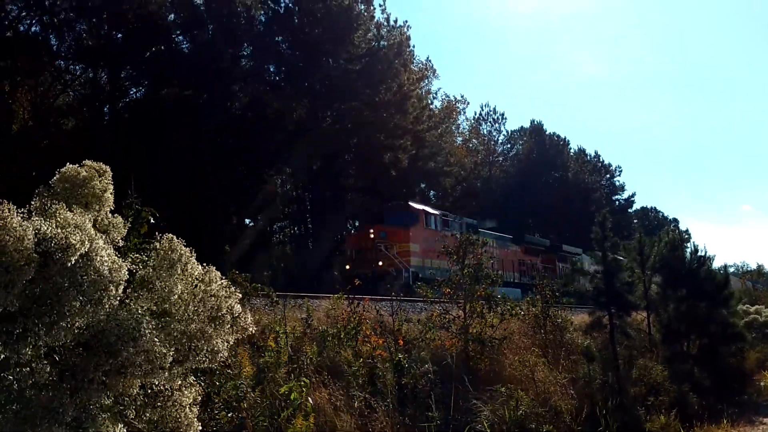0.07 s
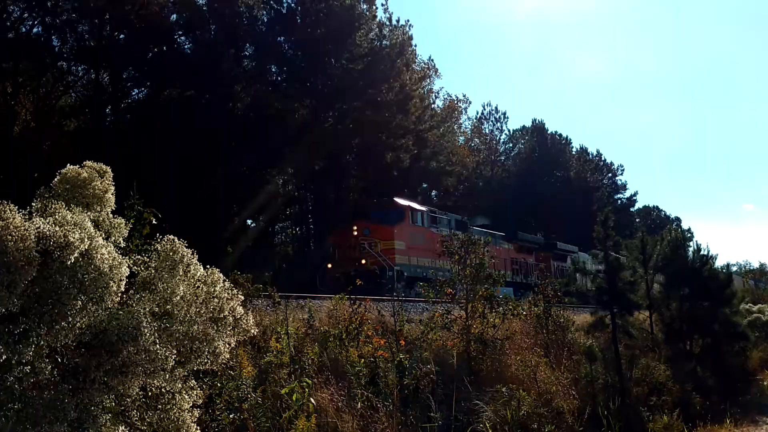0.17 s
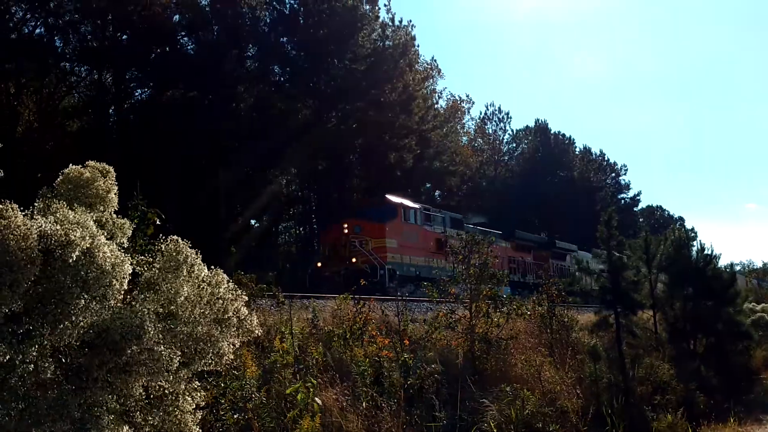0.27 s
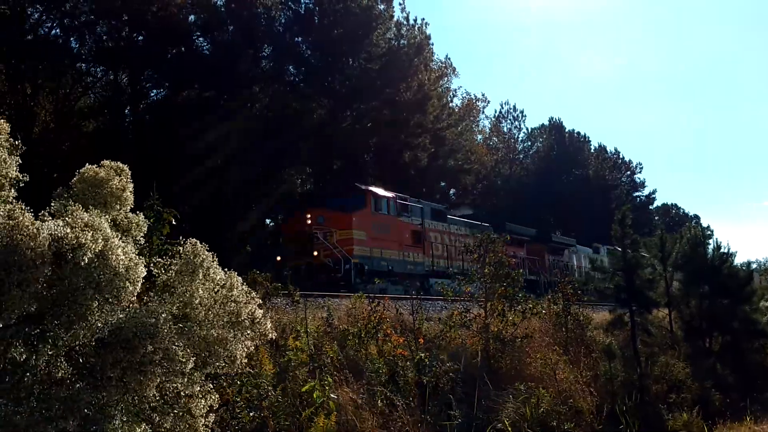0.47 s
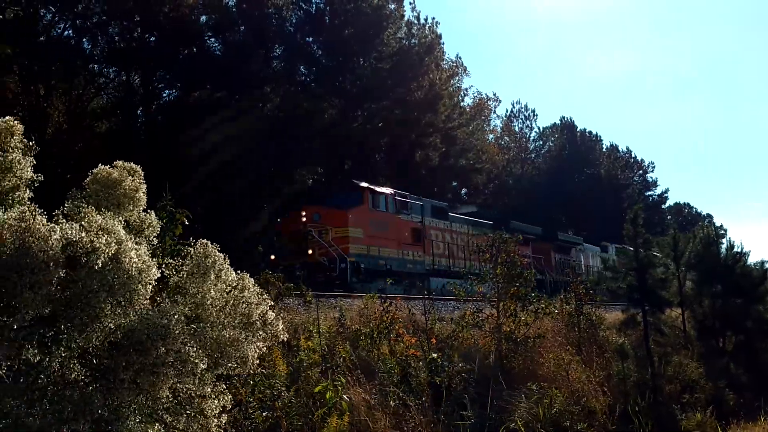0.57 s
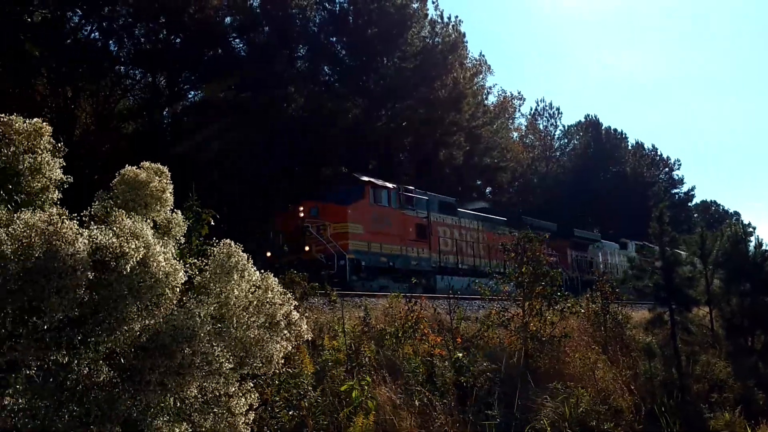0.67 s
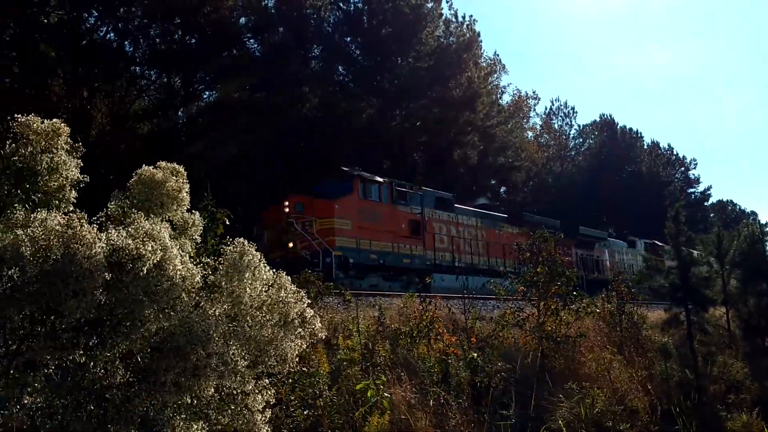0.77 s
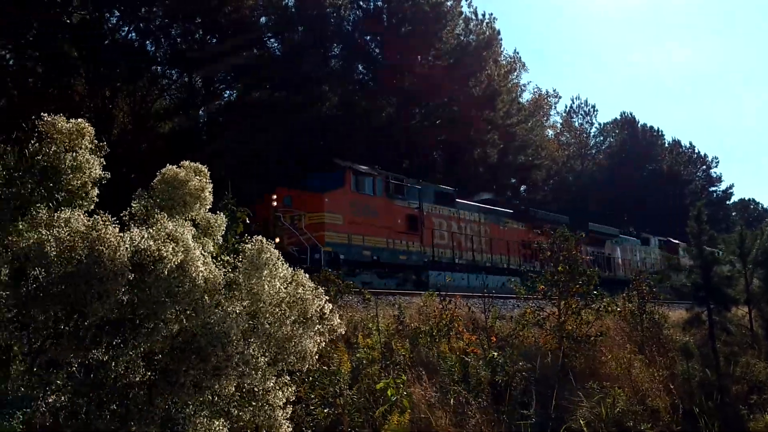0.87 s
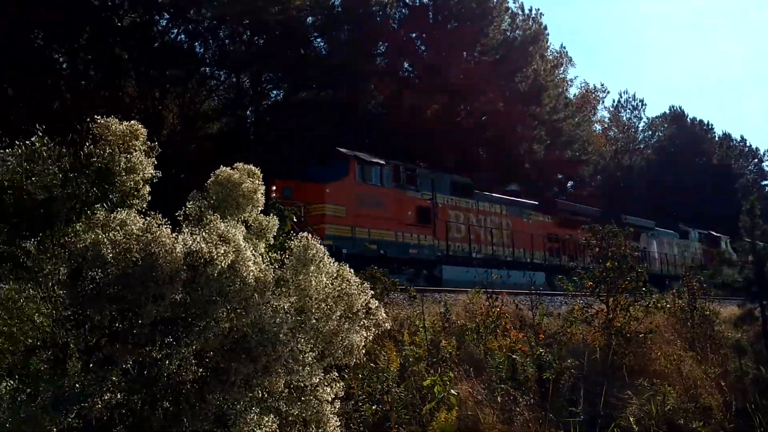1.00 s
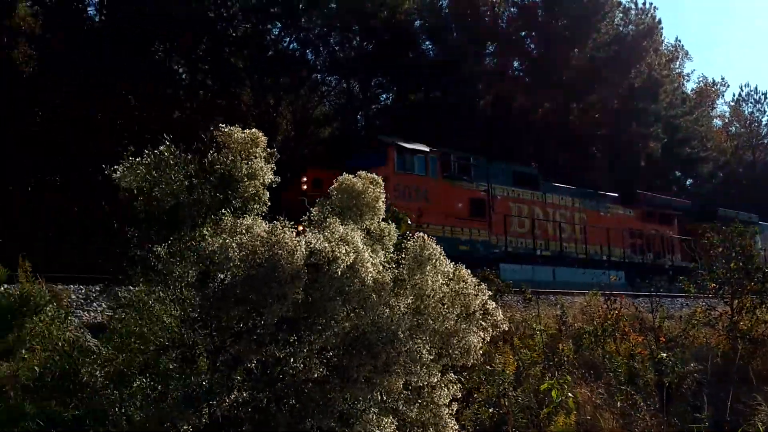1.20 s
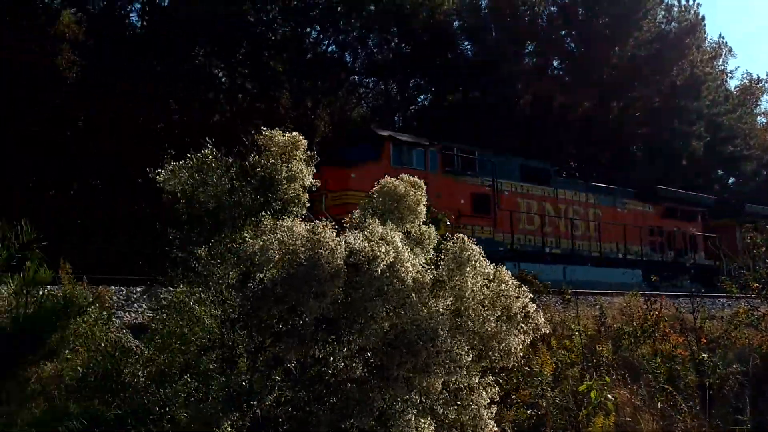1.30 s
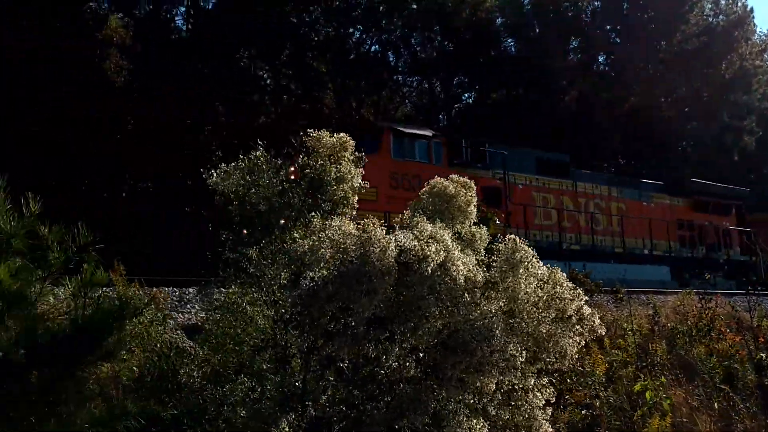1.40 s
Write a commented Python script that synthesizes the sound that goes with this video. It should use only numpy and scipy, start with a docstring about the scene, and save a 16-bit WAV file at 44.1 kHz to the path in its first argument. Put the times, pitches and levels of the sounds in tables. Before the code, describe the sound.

A train horn blows twice in quick succession over the low rumble of an approaching diesel freight train. The two-note blasts briefly overload the microphone and leave a short echo among the trackside trees.

```python
"""A two-note air horn gives two blasts as a freight locomotive comes out of the woods.
Each note is a stack of locked harmonics over rushing air, turning brassy as its pressure peaks.
Trees beside the track echo the horn; those behind the moving train send it back slightly flat.
Diesel and wheels rumble underneath, ducked by a limiter once the horn sounds, and the blasts
rasp briefly where they overload the microphone."""
import sys
import numpy as np
from scipy import signal
from scipy.fft import rfft, irfft
from scipy.io import wavfile
from scipy.ndimage import uniform_filter1d, minimum_filter1d

SR = 44100
rng = np.random.default_rng(int(sys.argv[2]) if len(sys.argv) > 2 else 0)


def materialize(psi):
    """Save the field psi as 16-bit PCM at rate SR to the path in sys.argv[1].

    A 1-D psi becomes a single channel; in a 2-D psi each row is a channel.
    """
    bounded = np.clip(np.atleast_2d(psi).T, -1, 1)
    quanta = np.round(bounded * 32767).astype(np.int16)
    wavfile.write(sys.argv[1], SR, quanta)


N = 63945

# Each horn's swell, one list per blast: t/s, fundamental level/dB, body level/dB, treble level/dB
LOW_SWELLS = [
    [(0.228, -19, -28, -66.5), (0.245, -9, -12, -58.5), (0.27, -4, -3.5, -27.5), (0.31, -2, 1.5, -5),
     (0.35, -3, -3, -16.5), (0.41, -3.5, -4, -21.5), (0.46, 2, 2, -8), (0.51, 4.5, 2.5, 4.5),
     (0.6, -3, -4.5, -2.5), (0.68, -0.5, -10, -16.5), (0.78, -4, -12.5, -23), (0.805, -4, -19, -19),
     (0.825, 0.5, -36.5, -40)],
    [(0.835, -13, -21.5, -61.5), (0.855, -4.5, -6.5, -25.5), (0.882, -7, -7, -20), (0.91, -3.5, -6.5, -9.5),
     (0.96, -0.5, -1, -1.5), (1.03, -3, -6, -9), (1.12, -6.5, -19, -35.5), (1.19, -7.5, -16, -22.5),
     (1.24, -16, -20, -33), (1.28, -36.5, -21, -53.5), (1.4, -46.5, -28, -63)],
]
HIGH_SWELLS = [
    [(0.24, -55.5, -67.5, -64), (0.265, -12.5, -2, -47.5), (0.305, -2, -2.5, -12), (0.36, -3.5, -3, -7),
     (0.42, -4.5, 0.5, -25), (0.48, 4.5, 5.5, 4.5), (0.56, 1.5, -2.5, 1.5), (0.62, 0, -6, -4),
     (0.71, -4, -2.5, -24.5), (0.78, -6.5, -19.5, -25), (0.83, -13, -7, -42.5)],
    [(0.83, -10.5, -52, -52), (0.855, -5, -6, -46.5), (0.882, -4.5, -10.5, -21), (0.91, -2.5, -2, -15.5),
     (0.96, 2.5, 0.5, 4.5), (1.02, 1, -9.5, -5), (1.1, -3, -20.5, -9.5), (1.19, -10.5, -18.5, -32),
     (1.255, -16.5, -20, -46), (1.3, -26.5, -56, -54)],
]
# Each horn's voicing on top of the swell, a row per harmonic: first blast level/dB, second blast level/dB
LOW_VOICING = [(-5.5, 0.5), (3, 3.5), (-12, -10.5), (-12, -12.5), (-9, -6), (-3, -0.5), (-6, 0),
               (-3.5, -5.5), (-7, 0.5), (-11, -6.5), (-13.5, -13.5), (-23.5, -16.5), (-20.5, -16.5),
               (-21.5, -15), (-31, -24), (-30, -38)]
HIGH_VOICING = [(2.5, 4.5), (-11.5, -7), (-13.5, -2.5), (-16, -3.5), (-19.5, -15), (-15, -12.5),
                (-13.5, -19), (-21, -24.5), (-25.5, -27)]
# Each horn's pitch; the high one sags as the pressure rises: t/s, f/Hz
LOW_BEND = [(.228, 412), (.28, 405), (.36, 401), (.52, 401.3), (.61, 398.2), (.8, 400), (.85, 402.3),
            (.96, 401.3), (1.04, 398.2), (1.24, 399.5)]
HIGH_BEND = [(.26, 522), (.32, 514.5), (.45, 514.7), (.61, 510), (.73, 514), (.83, 520), (.92, 514.8),
             (1.02, 510.2), (1.12, 511.5), (1.3, 529)]
# How hard a harmonic rides the treble swell: f/Hz, factor on the swell's dB
TREBLE_SWING = [(3600, 0.99), (4050, 0.96), (4500, 1.67), (5500, 1.2), (7000, 1.6), (8500, 2.6),
                (14000, 2.2)]
# Single overtones ring out or sink for a moment: centre t/s, f/Hz, level/dB
OVERTONE_GLINTS = [(0.241, 1214, -12), (.305, 4000, 4), (0.381, 2742, 9), (0.451, 4030, 9),
                   (.49, 3645, -9.5), (.67, 3626, 3.5), (.74, 4400, 15.5), (.78, 4013, 12),
                   (.62, 2000, 3.5), (.98, 2800, 0.5), (1.03, 3200, 6.5), (1.08, 1032, 10.5)]
# Tone of the air rushing through the horns: f/Hz, relative level/dB
AIR_EQ = [(200, -33), (500, -6.5), (1000, -10.5), (2400, -4.5), (3400, -0.5), (4300, -12.5), (5000, -14.5),
          (6000, -17), (7600, -33.5), (15000, -52.5)]
# Tone of the sum tones, where the two loud notes mix in the air: f/Hz, gain/dB
SUM_TONE_EQ = [(600, -77.5), (1000, -54), (1300, -37.5), (4000, -44.5), (15000, -62.5)]
# Stereo placement of the horns and of the train: f/Hz, left minus right level/dB
HORN_PAN = [(400, -18.5), (512, -6), (800, -8.5), (1025, -4), (1200, -3), (1535, 6.5), (1610, -6),
            (2050, -0.8), (3200, -2), (6000, -4.5), (12000, 1.5)]
TRAIN_PAN = [(60, 9.5), (130, -1), (290, -8.5), (640, -10), (1410, 0.5), (3100, -2), (7000, -3.5),
             (15000, -1)]
# Bursts of overload rasp: centre t/s, width/s, level/dB
RASP_BURSTS = [(.262, .003, -33), (.278, 0.007, -28), (.31, .015, -40), (.927, .005, -37),
               (0.956, 0.013, -35)]
# Tone of the rasp: f/Hz, relative level/dB
RASP_EQ = [(250, -17), (600, 9.5), (1500, 12), (5000, -11.5), (15000, -26.5)]
# Tone of the whole tree echo, and extra shaping for its flat part: f/Hz, gain/dB
ECHO_EQ = [(380, -8.5), (520, -15), (800, -2.5), (1550, -0.5), (2400, -13), (3400, -7.5), (5500, -7),
           (10000, -20)]
FLAT_ECHO_EQ = [(400, 3), (780, -0.5), (1500, 1), (2800, -12), (3600, -14.5), (8000, -18.5)]
# Roar of diesel and wheels: f/Hz, relative level/dB
ROAR_EQ = [(25, -41.5), (45, -31), (65, -11), (95, -9.5), (135, -4), (185, -4.5), (270, -11.5),
           (400, -10.5), (780, -8), (1000, -17.5), (1900, -17.5), (2400, -17), (2950, -16.5), (3800, -17.5),
           (4900, -31.5), (6300, -34), (7700, -56.5), (8800, -49.5), (10000, -62), (15000, -62.5)]
# How alike the roar is left and right: f/Hz, coherence (0 to 1)
ROAR_COHERENCE = [(60, 0.37), (130, 0.66), (300, 0.6), (640, 1), (1400, 0.81), (3100, 1), (7000, 0.31),
                  (15000, .1)]
# Diesel exhaust hum beneath the whole scene: f/Hz, level/dB
EXHAUST_TONES = [(103, -35.5), (176, -33), (208, -34)]

LOW_HORN_DB, HIGH_HORN_DB = -1.04, 0.74
BODY_TOP_HZ, TREBLE_HZ = 1370, 2780  # overtones cross from the body swell to the treble swell
TOP_HZ, TOP_DB, TOP_DB_PER_KHZ = 7100, -42.5, -4.5  # voicing slope for harmonics past the tables
VALVE_S = 0.048  # opening and closing time
JITTER_SHARE, JITTER_HZ = .0011, 28.4  # unsteady pitch
SHIMMER_DB, SHIMMER_HZ = 1.2, 12  # the treble flutters on its way through the air
GLINT_WIDTH_S, GLINT_WIDTH_HZ = 0.049, 65
AIR_DB, AIR_FOLLOW = -15.5, 0.39  # the air follows this share of the treble swell
ECHO_DB, ECHO_PREDELAY_S = -9, 0.016
ECHO_T60_S, ECHO_TREBLE_T60_S = 0.9, 0.8  # the treble dies sooner among the leaves
FLAT_ECHO_DB, FLAT_MAX_SHARE, FLAT_MAX_DELAY_S = -14.5, .07, 0.061
ROAR_DB, ROAR_PATCH_DB, ROAR_BRIGHTEN_DB_PER_S, TRAIN_RISE_DB_PER_S = -27, 1.5, 1, 3
EXHAUST_WAVER_SHARE, THROB_DB, THROB_HZ = .07, 2.5, 10
LEFT_LAG_S, LAG_FROM_HZ = 0.0003798, 1072  # the left microphone hears the treble later
LIMIT_DB, LIMIT_ATTACK_S, RELEASE_DB_PER_S = -10.5, 0.016, 12
CEILING, PEAK_HOLD_S = 0.97, 0.0041
LOW_CUT_HZ, HIGH_CUT_HZ = 29, 15400


def horn_blast(pitch, swell, voicing):
    """One blast of one horn: rushing air and locked harmonics that turn brassy with the pressure."""
    t = np.arange(N) / SR
    times, *levels = np.transpose(swell)
    fundamental_db, body_db, treble_db = [np.interp(t, times, db) for db in levels]
    valve = np.clip((t - times[0]) / VALVE_S + .5, 0, 1) * np.clip((times[-1] - t) / VALVE_S + .5, 0, 1)
    phase = 2 * np.pi * np.cumsum(pitch * (1 + JITTER_SHARE * wander(JITTER_HZ))) / SR
    out = unit(eq(rng.standard_normal(N), AIR_EQ)) * amp(AIR_DB + AIR_FOLLOW * treble_db)
    note_hz = np.median(pitch[valve > 0])
    for k in range(1, int(HIGH_CUT_HZ / note_hz)):
        hz = k * note_hz
        voice_db = voicing[k - 1] if k <= len(voicing) else TOP_DB + TOP_DB_PER_KHZ * (hz - TOP_HZ) / 1000
        blend = np.clip((hz - BODY_TOP_HZ) / (TREBLE_HZ - BODY_TOP_HZ), 0, 1)
        overtone_db = (1 - blend) * body_db + blend * curve_at(TREBLE_SWING, hz) * treble_db
        swell_db = fundamental_db if k == 1 else overtone_db
        shimmer_db = SHIMMER_DB * min(hz / TREBLE_HZ, 1) * wander(SHIMMER_HZ)
        glint_db = sum(db * np.exp(-((t - at) / GLINT_WIDTH_S) ** 2 - ((hz - f) / GLINT_WIDTH_HZ) ** 2)
                       for at, f, db in OVERTONE_GLINTS if abs(hz - f) < note_hz / 2)
        harmonic = np.sqrt(2) * np.sin(k * phase + 2 * np.pi * rng.random())
        out += amp(voice_db + swell_db + shimmer_db + glint_db) * harmonic
    return out * valve


def air_horn(bend, swells, voicings):
    """One horn blown twice along a single pitch curve."""
    pitch = np.interp(np.arange(N) / SR, *np.transpose(bend))
    return sum(horn_blast(pitch, swell, voicing) for swell, voicing in zip(swells, np.transpose(voicings)))


def overload_rasp(x):
    """Short, cued bursts of microphone overload: grit riding the crests of the wave."""
    t = np.arange(N) / SR
    bursts = sum(amp(db) * np.exp(-((t - at) / width) ** 2) for at, width, db in RASP_BURSTS)
    crests = x ** 2 / (abs(uniform_filter1d(x ** 2, size=400, axis=1)) + 1e-9)
    return bursts * unit(eq(crests * rng.standard_normal(x.shape), RASP_EQ))


def tree_echo(horns):
    """A diffuse wash from the trees; those the train has passed return it lower in pitch."""
    t = np.arange(N) / SR
    flat = sum(np.interp(t * (1 - drop) - FLAT_MAX_DELAY_S * rng.random(), t, horns, left=0)
               for drop in FLAT_MAX_SHARE * np.linspace(.5, 1, 4)) / 2
    flat = eq(flat, FLAT_ECHO_EQ)
    scatter = rng.standard_normal((2, 2, N)) * (t > ECHO_PREDELAY_S)  # in tune / flat, left / right
    lows = signal.sosfiltfilt(signal.butter(2, BODY_TOP_HZ, fs=SR, output="sos"), scatter)
    tails = lows * amp(-60 * t / ECHO_T60_S) + (scatter - lows) * amp(-60 * t / ECHO_TREBLE_T60_S)
    tails /= np.linalg.norm(tails, axis=2, keepdims=True)
    beside = amp(ECHO_DB) * signal.fftconvolve(horns[None], tails[0], axes=1)
    behind = amp(FLAT_ECHO_DB) * signal.fftconvolve(flat[None], tails[1], axes=1)
    return eq((beside + behind)[:, :N], ECHO_EQ)


def train_roar():
    """Wheels and diesel: a patchy stereo noise bed that slowly brightens."""
    frame, hop = 1024, 256
    hz = np.fft.rfftfreq(frame, 1 / SR)
    t = np.arange(N // hop + 5)[:, None] * hop / SR
    noise = rng.standard_normal((5, len(t), len(hz)))
    left, spread = noise[0] + 1j * noise[1], noise[2] + 1j * noise[3]
    patches = unit(uniform_filter1d(uniform_filter1d(noise[4], size=10, axis=0), size=8, axis=1))
    coherence = np.clip(curve_at(ROAR_COHERENCE, hz), 0, 1)
    right = coherence * left + np.sqrt(1 - coherence ** 2) * spread
    brighten_db = ROAR_BRIGHTEN_DB_PER_S * t * np.minimum(hz / TREBLE_HZ, 1)
    level_db = curve_at(ROAR_EQ, hz) + ROAR_PATCH_DB * patches + brighten_db
    spectra = np.array([left, right]) * mic_gains(TRAIN_PAN, hz)[:, None] * amp(level_db)
    _, roar = signal.istft(spectra.transpose(0, 2, 1), nperseg=frame, noverlap=frame - hop)
    return amp(ROAR_DB) * unit(roar[:, :N])


def exhaust_hum():
    """The diesel's exhaust: low tones that waver in pitch and throb together."""
    lead_rad = np.array([[1.45], [0]])  # the left microphone leads
    hum = np.zeros((2, N))
    for hz, db in EXHAUST_TONES:
        phase = 2 * np.pi * np.cumsum(hz * (1 + EXHAUST_WAVER_SHARE * wander(rate_hz=27))) / SR
        hum += amp(db) * abs(mic_gains(TRAIN_PAN, np.array([hz]))) * np.sin(lead_rad + phase)
    return hum * amp(THROB_DB * wander(THROB_HZ))


def mic_gains(pan, hz):
    """Complex left and right gains for sound from the track: constant power, treble late on the left."""
    ratio = amp(curve_at(pan, hz))
    lag_turns = LEFT_LAG_S * np.maximum(hz - LAG_FROM_HZ, 0)
    left = ratio * np.exp(-2j * np.pi * lag_turns)
    return np.array([left, np.ones(len(hz))]) * np.sqrt(2 / (1 + ratio ** 2))


def amp(db):
    """Decibels to gain."""
    return 10 ** (np.asarray(db) / 20)


def unit(x):
    """Scales to rms 1."""
    return x / np.sqrt(np.mean(x ** 2) + 1e-20)


def curve_at(points, hz):
    """Reads a table on a log-frequency axis."""
    f, value = np.transpose(points)
    return np.interp(np.log(hz + 1), np.log(f + 1), value)


def wander(rate_hz):
    """Smooth random modulation of rms 1."""
    hz = np.fft.rfftfreq(N, 1 / SR)
    return unit(irfft(rfft(rng.standard_normal(N)) * np.exp(-(hz / rate_hz) ** 2) * (hz > 0), N))


def eq(x, points):
    """Zero-phase EQ from a table of f/Hz, gain/dB."""
    hz = np.fft.rfftfreq(2 * N, 1 / SR)
    return irfft(rfft(x, 2 * N) * amp(curve_at(points, hz)))[..., :N]


def scene():
    """Horns up front, the trees' echo around them, the nearing train underneath."""
    horns = amp(LOW_HORN_DB) * air_horn(LOW_BEND, LOW_SWELLS, LOW_VOICING)
    horns += amp(HIGH_HORN_DB) * air_horn(HIGH_BEND, HIGH_SWELLS, HIGH_VOICING)
    horns += eq(horns ** 2, SUM_TONE_EQ)  # faint sum tones
    hz = np.fft.rfftfreq(2 * N, 1 / SR)
    direct = irfft(rfft(horns, 2 * N) * mic_gains(HORN_PAN, hz))[:, :N]
    approach = amp(TRAIN_RISE_DB_PER_S * np.arange(N) / SR)
    return direct + tree_echo(horns) + (train_roar() + exhaust_hum()) * approach


def record(dry):
    """Low cut, a limiter that grabs fast and lets go slowly, a peak catcher, overload and high cut."""
    dry = signal.sosfilt(signal.butter(2, LOW_CUT_HZ, "highpass", fs=SR, output="sos"), dry)
    power_db = 10 * np.log10(abs(uniform_filter1d((dry ** 2).mean(0), size=400)) + 1e-12)
    release_db = RELEASE_DB_PER_S * np.arange(N) / SR
    held_db = np.maximum.accumulate(power_db + release_db) - release_db
    over_db = np.maximum(held_db - LIMIT_DB, 0)
    pole = np.exp(-1 / (LIMIT_ATTACK_S * SR))
    limited = dry * amp(-signal.lfilter([1 - pole], [1, -pole], over_db))
    hold = round(PEAK_HOLD_S * SR)
    peak_gain = minimum_filter1d(CEILING / np.maximum(abs(limited).max(0), CEILING), 2 * hold)
    peak_gain = uniform_filter1d(uniform_filter1d(peak_gain, hold), hold)
    clipped = np.clip(limited * peak_gain + overload_rasp(limited), -1, 1)
    high_cut = signal.firwin(511, HIGH_CUT_HZ, window=("kaiser", 9), fs=SR)
    return signal.oaconvolve(clipped, high_cut[None], "same")


dry = scene()
out = record(dry)
materialize(out)
```